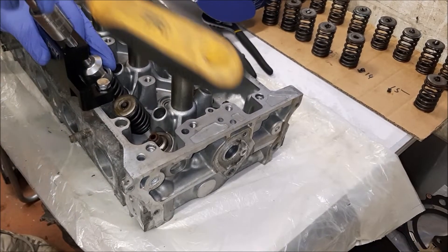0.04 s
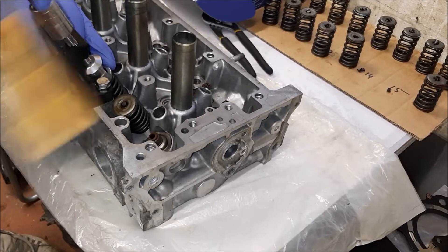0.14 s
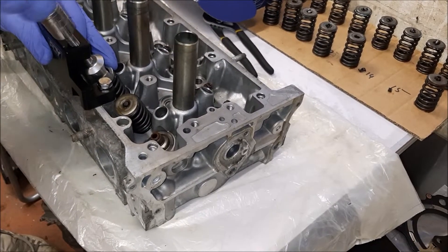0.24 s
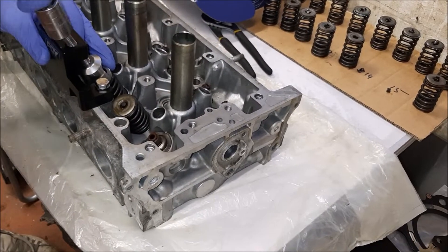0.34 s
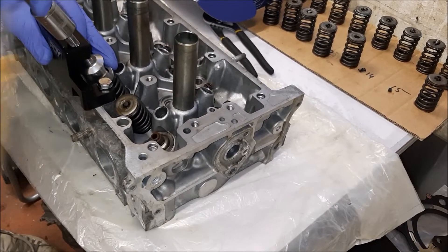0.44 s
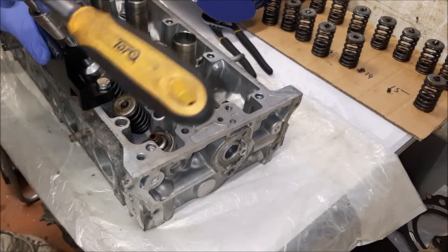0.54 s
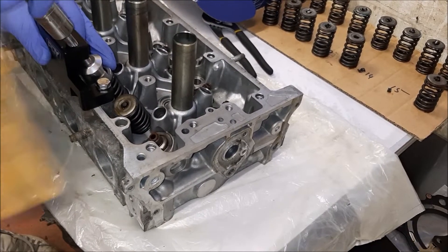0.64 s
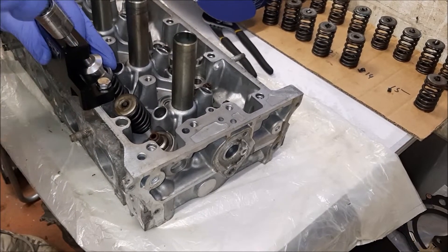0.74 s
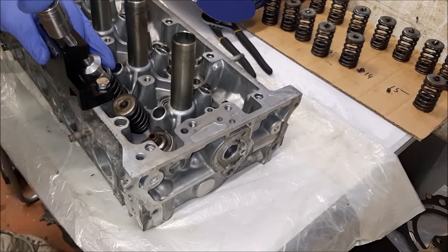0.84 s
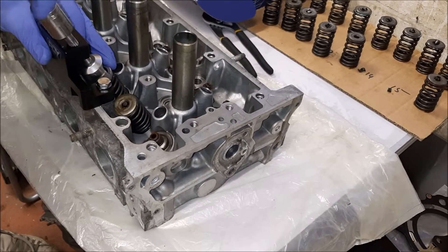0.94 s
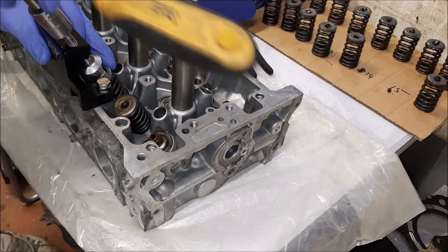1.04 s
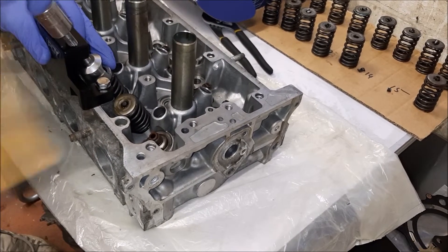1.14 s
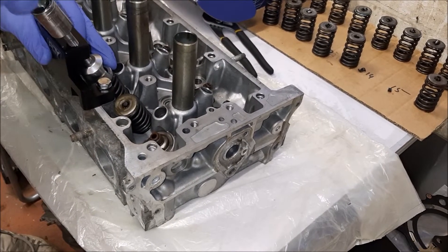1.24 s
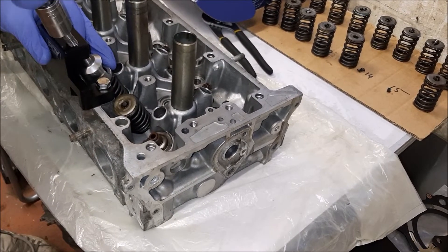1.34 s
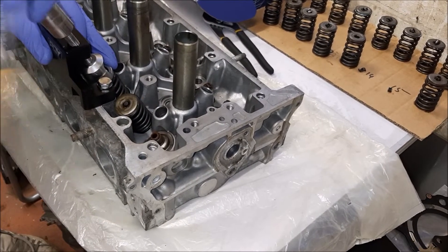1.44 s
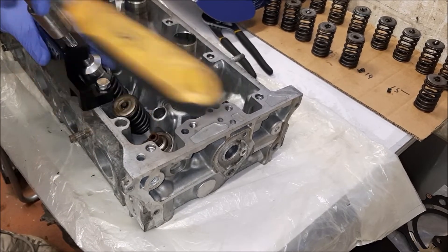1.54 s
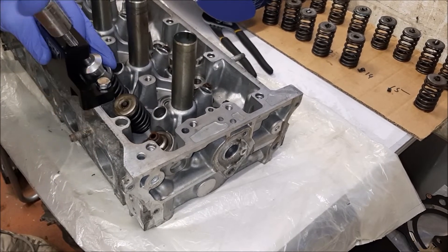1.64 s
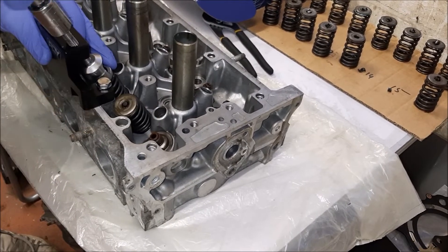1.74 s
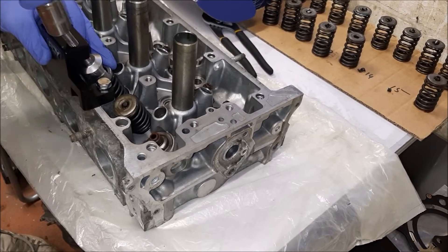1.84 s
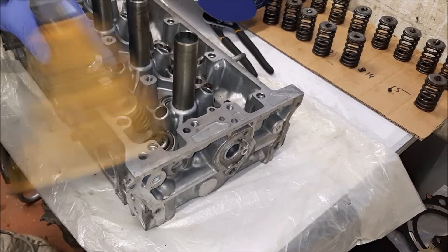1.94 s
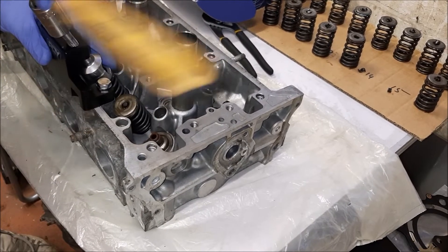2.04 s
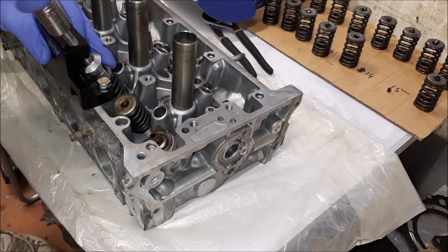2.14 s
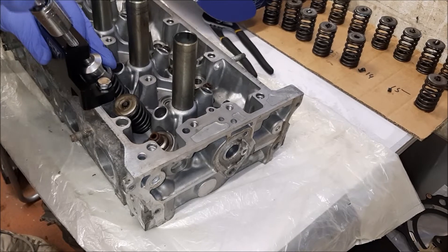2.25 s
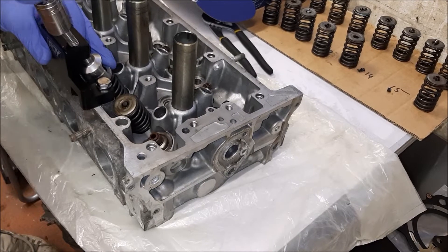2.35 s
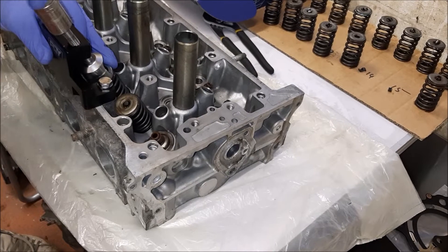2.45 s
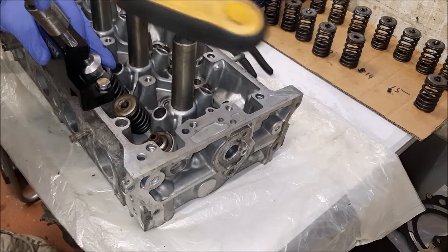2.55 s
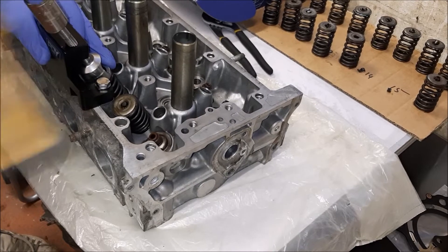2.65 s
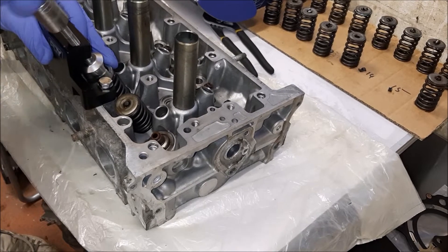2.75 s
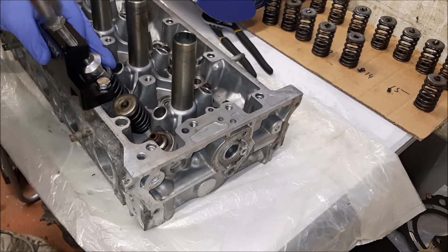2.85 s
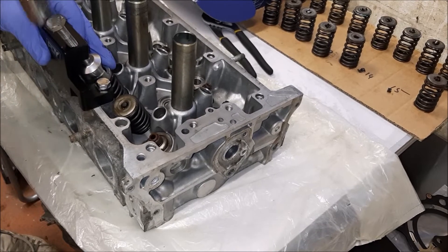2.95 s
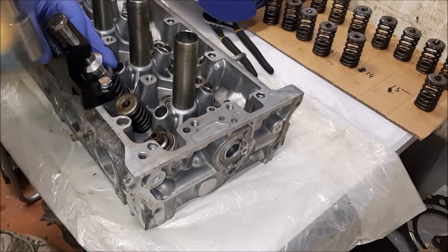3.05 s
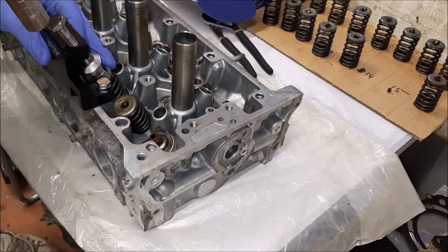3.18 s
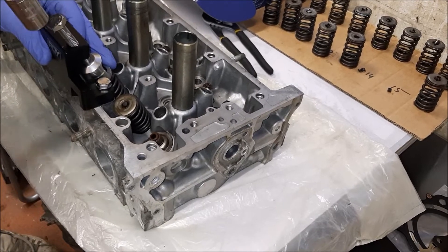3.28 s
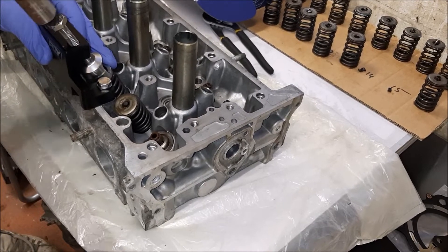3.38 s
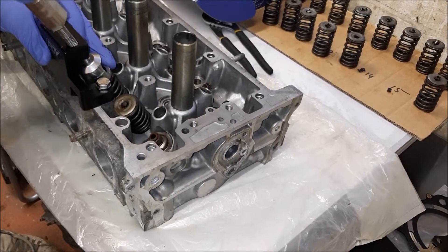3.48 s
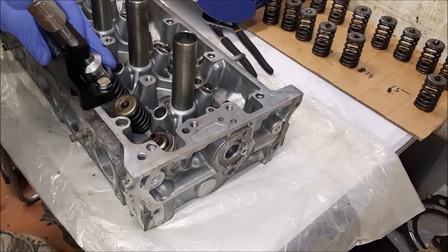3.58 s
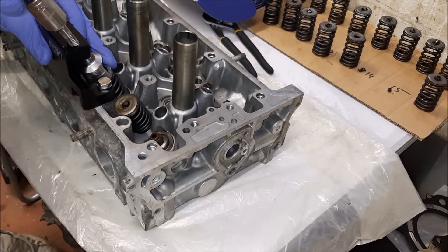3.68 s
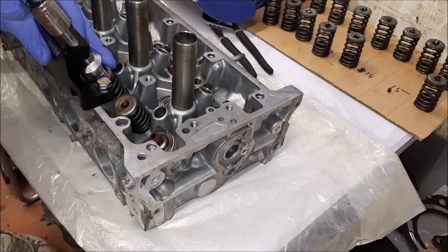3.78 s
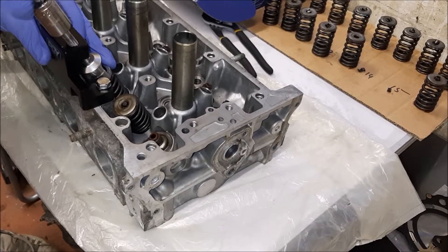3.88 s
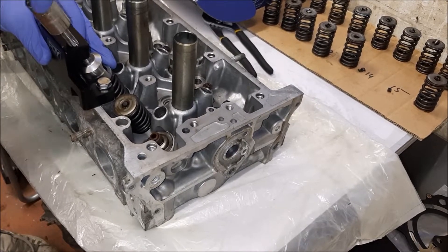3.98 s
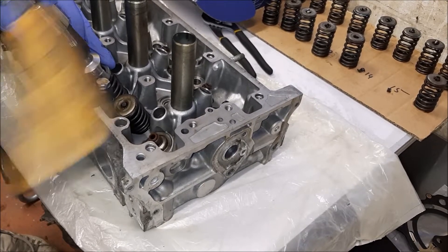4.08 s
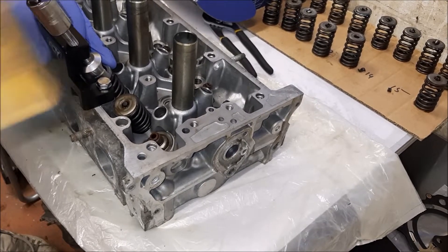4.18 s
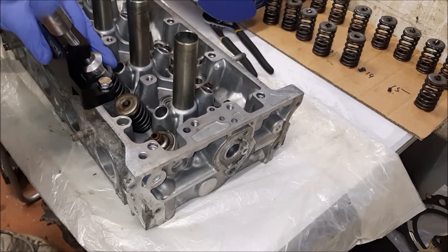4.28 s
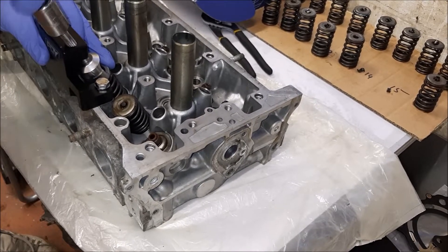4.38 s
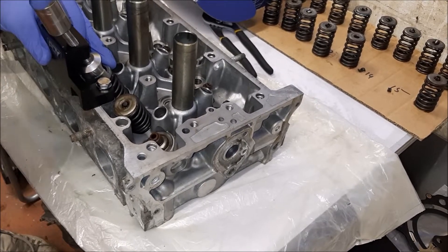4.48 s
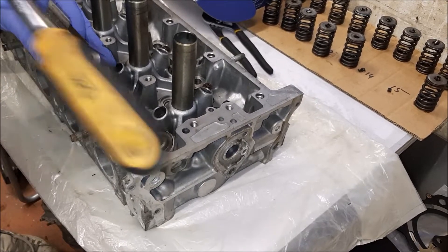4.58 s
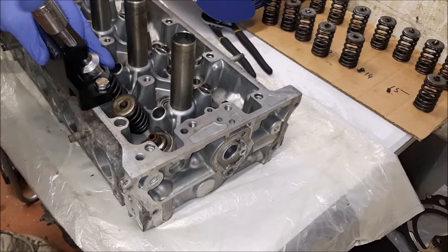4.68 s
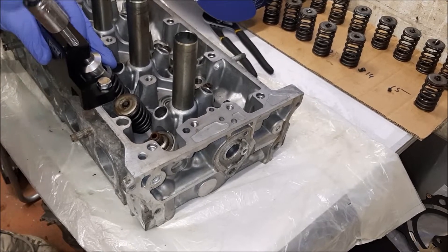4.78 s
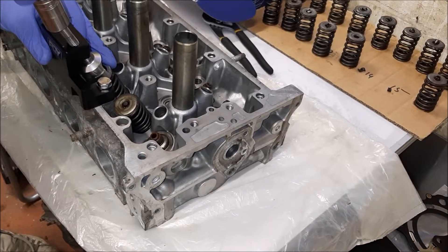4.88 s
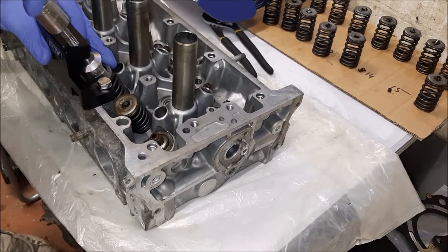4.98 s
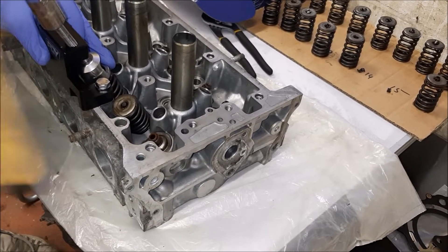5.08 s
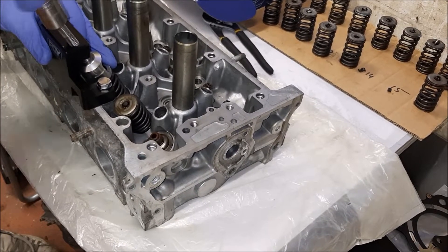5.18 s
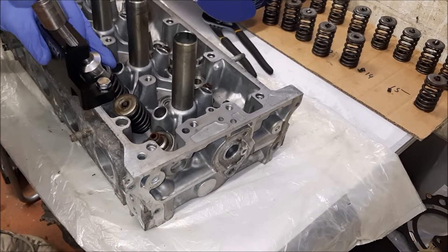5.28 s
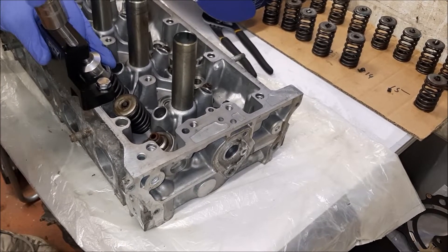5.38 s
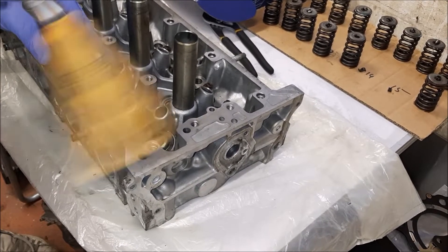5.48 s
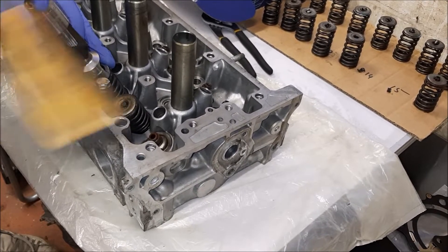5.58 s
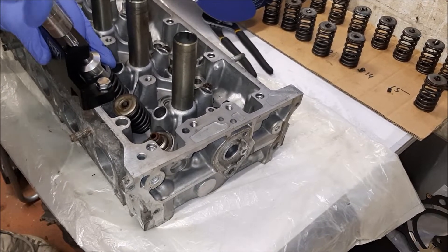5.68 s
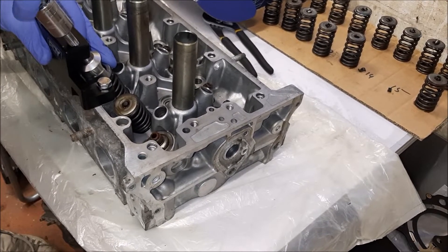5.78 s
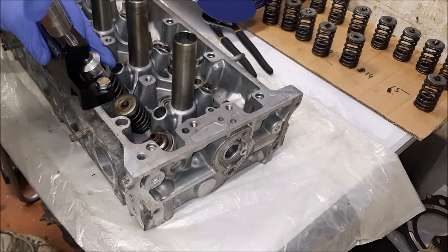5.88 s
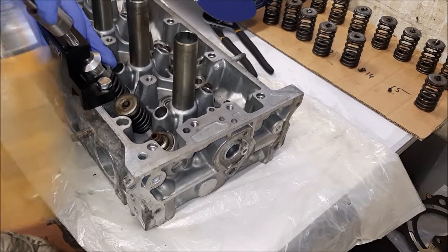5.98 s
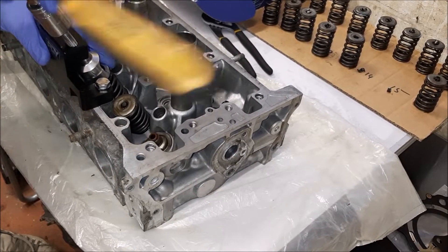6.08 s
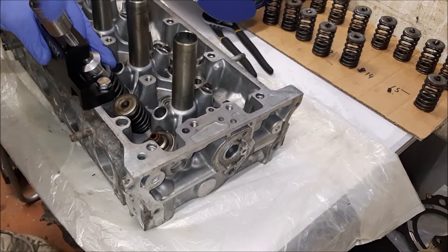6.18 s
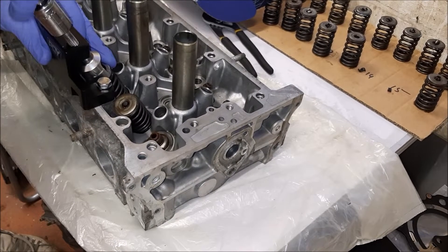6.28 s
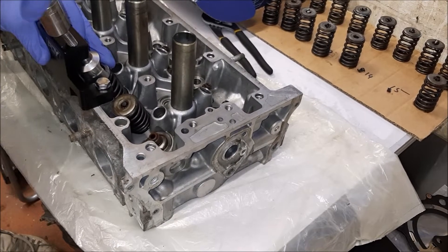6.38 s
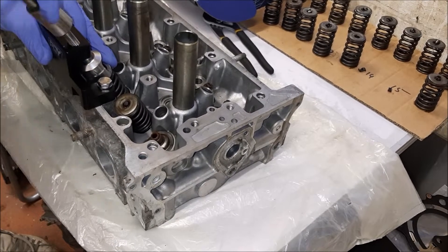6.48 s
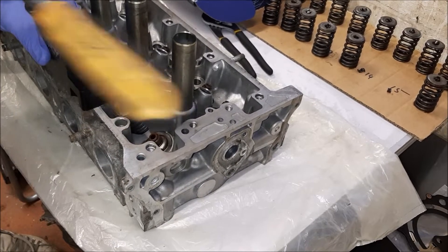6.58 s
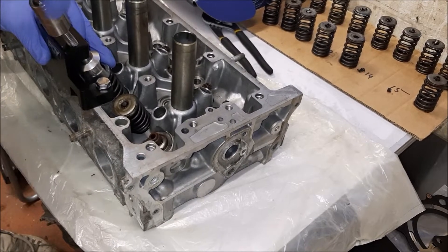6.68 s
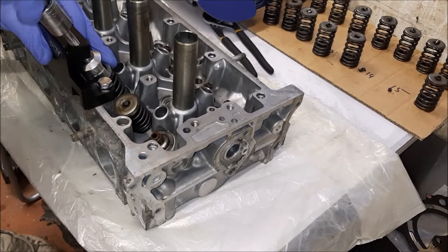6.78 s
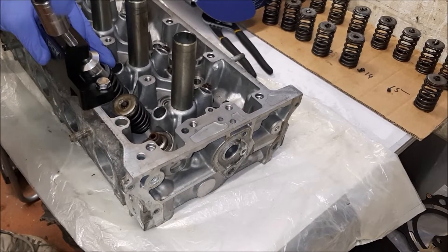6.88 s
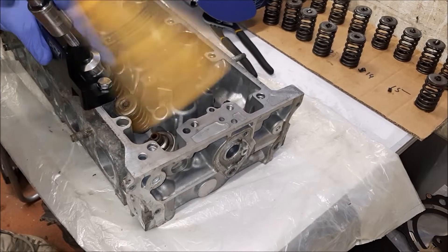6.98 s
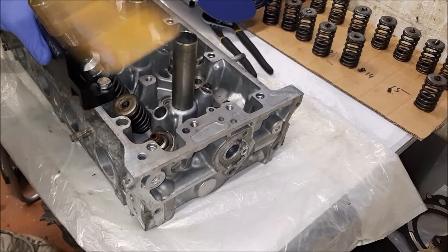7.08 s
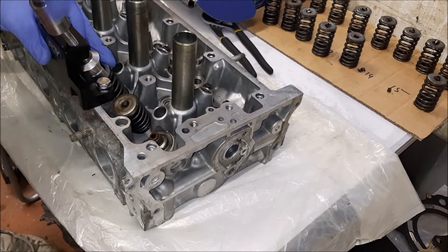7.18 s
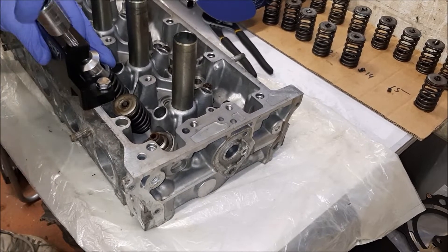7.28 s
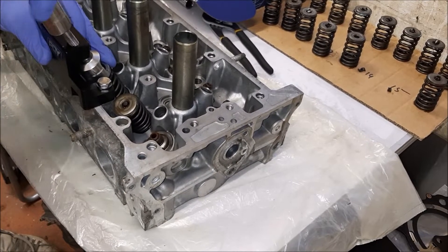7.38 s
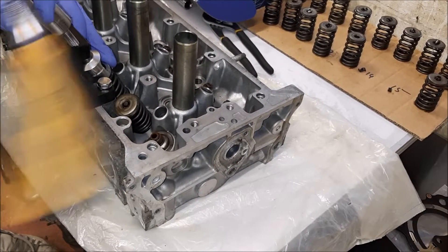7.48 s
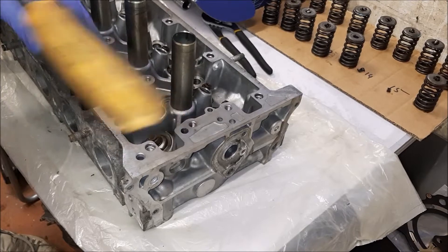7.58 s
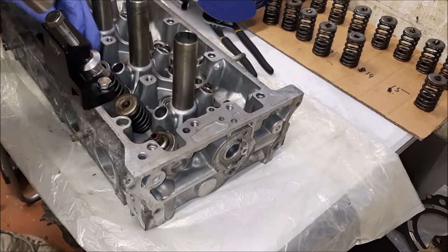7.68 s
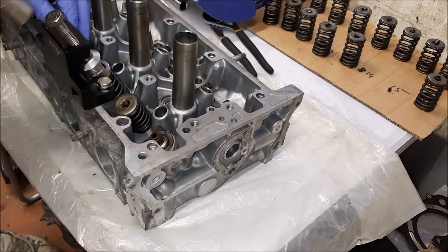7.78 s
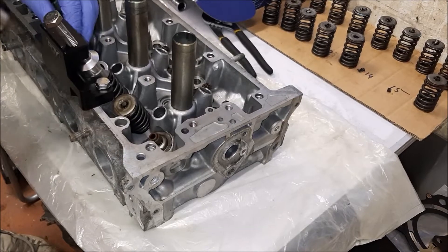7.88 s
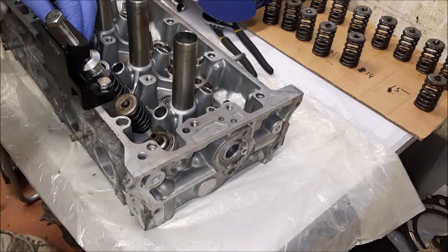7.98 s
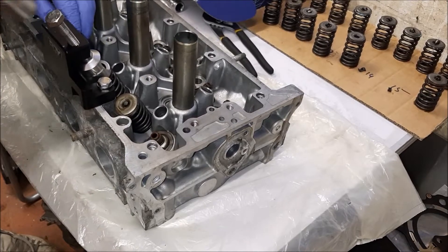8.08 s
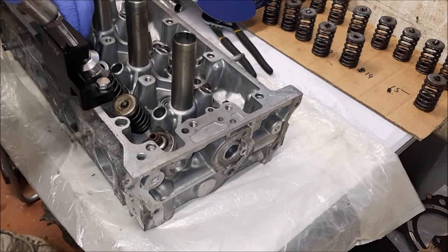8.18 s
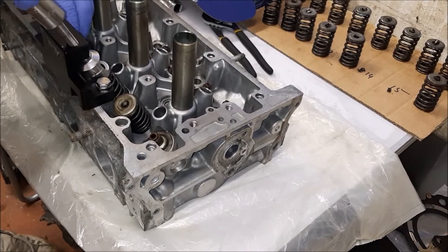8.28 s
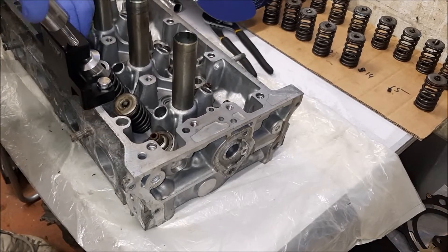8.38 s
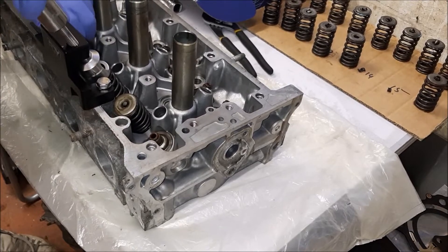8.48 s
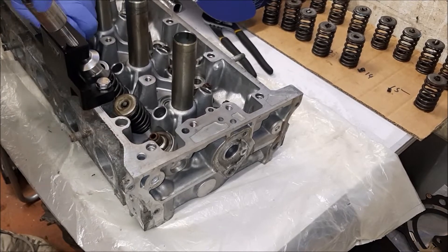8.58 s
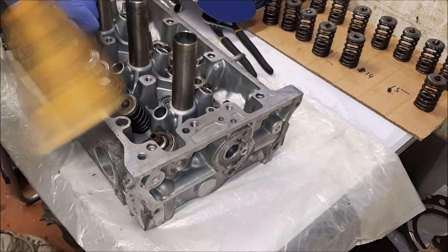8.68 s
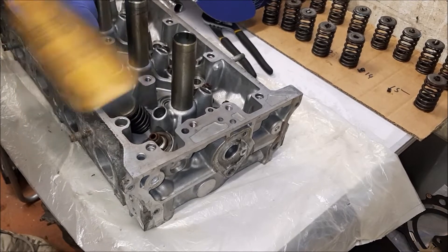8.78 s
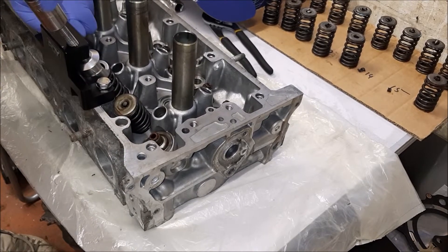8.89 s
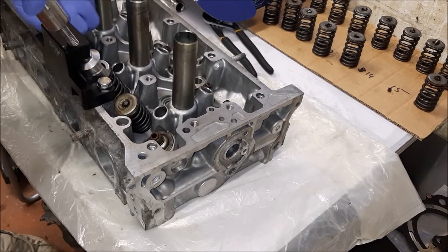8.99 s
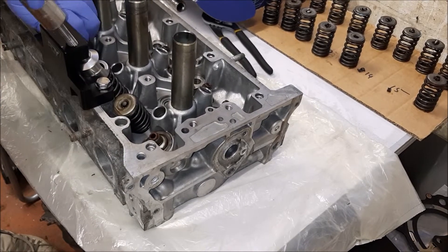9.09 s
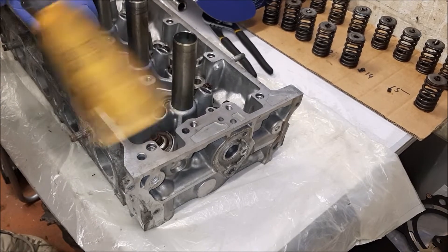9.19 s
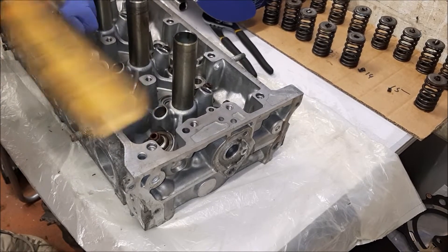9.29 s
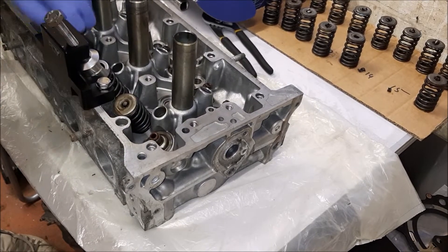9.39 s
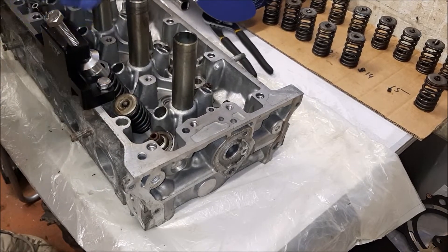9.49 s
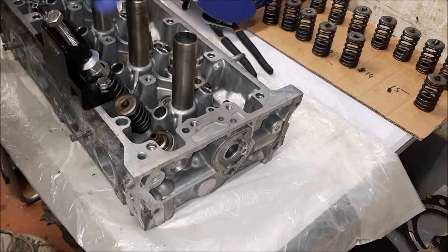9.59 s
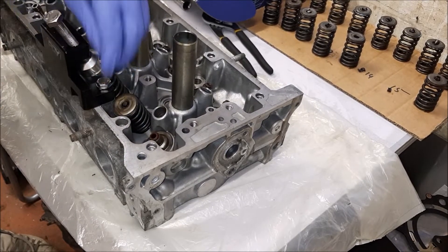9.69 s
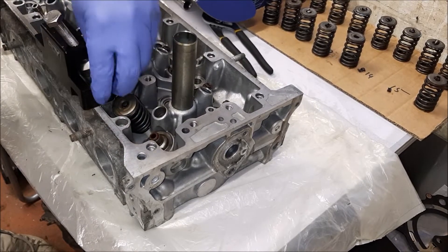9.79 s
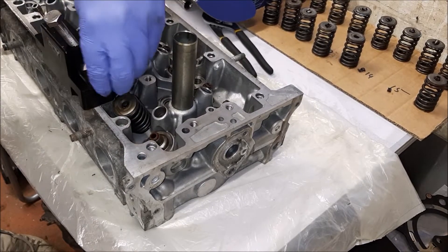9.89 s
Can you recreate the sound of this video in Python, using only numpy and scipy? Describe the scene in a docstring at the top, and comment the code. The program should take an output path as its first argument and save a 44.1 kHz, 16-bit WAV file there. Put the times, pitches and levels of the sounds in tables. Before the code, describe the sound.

Close stereo pickup in a small, live garage: a ratchet handle zips backward about twice a second, its teeth merging into a bright buzzing rasp. Between zips come quiet scrapes, steel chinks and a low bench rumble. Near three seconds it stops for a loud clank and small knocks, resumes for several swings, then slows to separate clicks, one short weak zip and faint glove rustling.

```python
"""In a small garage, a ratchet wrench works a valve tool on an aluminium cylinder head, about two swings a second
with longer pauses. On each back swing the pawl drops from tooth to tooth, and these impulses, speeding up and
slowing again, excite the wrench and head. On the drive stroke the steel rings in decaying modes and slides with
uneven friction noise, while the workbench rumbles in low bands under the hand. Short echoes and a faint steady
room noise surround it all."""
import sys
import numpy as np
from scipy import signal
from scipy.fft import rfft, irfft, next_fast_len
from scipy.io import wavfile
from scipy.ndimage import map_coordinates

SR = 44100
rng = np.random.default_rng(int(sys.argv[2]) if len(sys.argv) > 2 else 0)


def int16_out(signal):
    """Quantize to a 16-bit WAV file."""
    q = np.round(np.clip(np.atleast_2d(signal).T, -1, 1) * 32767)
    wavfile.write(sys.argv[1], SR, q.astype(np.int16))


N = 438354  # length in samples


def amp(db):
    """Level and amplitude: 20 dB is a factor of ten in amplitude."""
    return 10 ** (np.asarray(db) / 20)


def unit(x):
    """Normalisation to a root-mean-square amplitude of 1."""
    return x / np.sqrt(np.mean(x ** 2) + 1e-20)


def along(points, hz):
    """Logarithmic frequency scale: (f/Hz, value) points joined by straight lines over log frequency."""
    f, v = np.transpose(points)
    return np.interp(np.log(hz + 1), np.log(f + 1), v)


def wobble(rate):
    """Slow random modulation: a smooth curve through random knots, rate knots a second."""
    knots = rng.standard_normal(int(N * rate / SR) + 4)
    return map_coordinates(knots, [np.arange(N) * rate / SR])


def filtered(x, response):
    """Linear filtering: the spectrum of x times a complex response of frequency."""
    m = next_fast_len(N + SR // 2)
    return irfft(rfft(x, m) * response(np.fft.rfftfreq(m, 1 / SR)), m)[..., :N]


def coloured(x, spectrum, size=8192):
    """Minimum-phase filtering: a causal impulse response of energy 1 with the shape of this spectrum."""
    log_gain = np.log(amp(along(spectrum, np.fft.rfftfreq(size, 1 / SR))))
    cepstrum = irfft(log_gain)
    # folding the cepstrum onto positive times makes the filter causal
    cepstrum[1:size // 2] *= 2
    cepstrum[size // 2 + 1:] = 0
    pulse = irfft(np.exp(rfft(cepstrum)))
    pulse = pulse / np.linalg.norm(pulse)
    return signal.fftconvolve(np.atleast_2d(x), pulse[None], axes=1)[:, :N]


def grains(rate, spread_db):
    """Granular friction: randomly timed impulses of uneven size and sign, rate a second, rms 1."""
    size = amp(spread_db * np.clip(rng.standard_normal(N), -2, 2))
    present = rng.random(N) < rate / SR
    return unit(present * size * np.sign(rng.standard_normal(N)))


def burst(t60):
    """Exponential decay: noise that starts at rms 1 and falls 60 dB in t60 seconds."""
    t = np.arange(SR // 4) / SR
    return rng.standard_normal(len(t)) * amp(-60 * t / t60)


def add(track, s, sound):
    """Superposition: a sound is summed into a track at time s."""
    part = track[max(round(s * SR), 0):][:len(sound)]
    part += sound[:len(part)]


def swell(s, length, db, rise, fall, sag_db=0):
    """Exponential envelope: climbs to db at time s, sags for its length, then dies; rise and fall in dB/s."""
    t = np.arange(0, N, 64) / SR - s  # one gain every 64 samples
    held = np.clip(t / length, 0, 1)
    climb = abs(rise) * np.maximum(-t, 0)
    release = abs(fall) * np.maximum(t - length, 0)
    return amp(db - climb - sag_db * held - release)


def together(swells):
    """Incoherent summation: swells add in power, giving one gain per sample."""
    gain = np.sqrt(np.sum(np.square(swells), axis=0))
    return np.interp(np.arange(N), np.linspace(0, N, len(gain)), gain)


# envelope of a push: time to climb 20 dB in a drive stroke and in a change of grip, sag while held, release
DRIVE_ATTACK_S, GRIP_ATTACK_S, DRIVE_SAG_DB, DRIVE_RELEASE_DB_PER_S = 0.078, 0.047, 9, 170.5


def push(s, length, db, attack):
    """Attack, hold and release: the hand leans on the tool, sags while holding and lets go."""
    return swell(s, length, db, 20 / attack, DRIVE_RELEASE_DB_PER_S, DRIVE_SAG_DB)


# spectrum of the room noise: f/Hz, relative level/dB
AIR_SPECTRUM = [(20, -7.5), (60, -6), (134, 0.5), (200, -7), (420, -14), (700, -18.5), (1200, -23.5),
                (2050, -25), (3000, -32.5), (5000, -23.5), (8700, -32.5), (12000, -23.5), (16000, -24.5)]


def air(level_db=-80):
    """Partly correlated stationary noise: a shared part and weaker independent parts at the two ports."""
    left, right, shared = (coloured(rng.standard_normal(N), AIR_SPECTRUM) for _ in range(3))
    return amp(level_db) * (shared + 0.33 * np.vstack([left, right]))


# decay of the garage echoes: f/Hz, reverberation time T60/s
GARAGE_DECAY = [(150, 0.66), (500, 0.27), (1200, 0.29), (3000, 0.32), (7000, 0.28), (15000, 0.21)]


def room_answer(wet_db, walls_db):
    """Reverberation: a brief dense burst of close reflections and a tail that decays at its own rate per band."""
    hz, t, z = signal.stft(rng.standard_normal((2, SR // 2)), SR, nperseg=256)
    decay = amp(-60 * t / along(GARAGE_DECAY, hz)[:, None])
    build_up = 1 - np.exp(-t / 0.0015)
    tail = signal.istft(z * decay * build_up, SR, nperseg=256)[1]
    near = rng.standard_normal(tail.shape) * amp(-60 * np.arange(tail.shape[1]) / SR / 0.015)  # T60 15 ms
    return (amp(wet_db) * unit(tail) + amp(walls_db) * unit(near)) / np.sqrt(tail.shape[1])


def garage(x, wet_db, walls_db, lag, size=16384):
    """Interaural delay and reverberation: direct sound reaches the left port first (lag in s); the echoes
    shift, crossfaded from window to window, as hand and tool move."""
    direct = filtered(x, lambda f: np.array([np.ones_like(f), np.exp(-2j * np.pi * f * lag)]))
    hop = size // 2
    fade = np.sin(np.pi * np.arange(size) / size)
    padded = np.pad(x, ((0, 0), (hop, size)))
    echoes = np.zeros((2, padded.shape[1] + SR))
    for i in range(0, N + hop, hop):
        part = signal.fftconvolve(fade * padded[:, i:i + size], room_answer(wet_db, walls_db), axes=1)
        echoes[:, i:i + part.shape[1]] += part
    out = direct + echoes[:, hop:][:, :N]
    return out * np.sqrt(2 / (1 + amp(walls_db) ** 2 + amp(wet_db) ** 2))


# spectra of the bench rumble and of the hollow rub: f/Hz, relative level/dB
BENCH_SPECTRUM = [(20, -29), (35, -26), (48, -25.5), (65, -11.5), (92, -22), (112, -6), (137, 4.5),
                  (155, -2.5), (180, -11), (210, -15.5), (400, -52)]
HOLLOW_SPECTRUM = [(150, -31), (235, -6), (280, 0.5), (308, -10.5), (332, 2.5), (365, -3), (420, 3),
                   (470, -3), (700, -6), (920, -8.5), (1300, -16), (3000, -47.5)]
# drive strokes, when the wrench takes the load and rocks the head on the bench:
# t/s, duration/s, relative rumble level/dB, relative hollow rub level/dB
DRIVES = [(0.333, 0.23, -52, -56.5), (0.891, 0.42, -51.5, -59), (1.496, 0.097, -43, -56.5),
          (1.826, .3, -47.5, -49.5), (2.383, 0.34, -49, -54), (2.786, 0.27, -47.5, -48),
          (4.392, 0.26, -51.5, -56), (4.933, 0.077, -44, -54), (5.268, 0.14, -46.5, -50),
          (5.75, .32, -55.5, -61), (6.423, 0.19, -52, -55), (6.855, 0.083, -49, -55.5),
          (7.408, .18, -50.5, -62), (8.559, 0.085, -58.5, -60.5), (9.121, 0.028, -56.5, -58.5)]
# changes of grip: t/s, duration/s, then relative levels/dB of rumble, hollow rub, scrape
SHIFTS = [(0.006, 0.029, -39, -48.5, -46), (3.012, 0.064, -53.5, -46, -68), (3.19, 0.075, -56, -55, -74),
          (3.601, 0.11, -62, -56.5, -68), (3.658, .012, -58, -62, -54.5), (3.737, 0.061, -48.5, -51, -53),
          (3.937, 0.081, -57, -55.5, -53), (4.045, 0.082, -61, -74, -57.5),
          (7.646, 0.078, -63, -61.5, -60.5), (8.078, 0.049, -62, -65, -79), (8.371, 0.093, -57, -51.5, -60),
          (8.908, .03, -61, -66, -65), (9.324, 0.067, -77, -68.5, -66), (9.603, 0.018, -60.5, -85, -89)]
RUB_RISE_DB_PER_S, RUB_FALL_DB_PER_S = 79, 71
SWING_RUMBLE_DB = -8.5  # rumble of a back swing relative to its rub


def bench(rumble_db=0, rub_db=-1, lumps_db=1.5):
    """Forced vibration and friction: the rocking head shakes the bench top and rubs on its cloth,
    in mid swing and under each push."""
    swings = [swell(s + length / 2, length / 2, db, RUB_RISE_DB_PER_S, RUB_FALL_DB_PER_S, 0.71)
              for s, length, *_, db in SWINGS]
    pushes = [(*row, DRIVE_ATTACK_S) for row in DRIVES]
    pushes += [(*row[:4], GRIP_ATTACK_S) for row in SHIFTS]
    low_pushes = [push(s, length, db, attack) for s, length, db, _, attack in pushes]
    hollow_pushes = [push(s, length, db, attack) for s, length, _, db, attack in pushes]
    low = together([amp(SWING_RUMBLE_DB) * gain for gain in swings] + low_pushes)
    hollow = together(swings + hollow_pushes)
    lumps = lumps_db * wobble(22)
    rumble = low * amp(rumble_db + lumps) * coloured(rng.standard_normal(N), BENCH_SPECTRUM)
    rub_grain = coloured(grains(rate=900, spread_db=6.5), HOLLOW_SPECTRUM)
    rub = hollow * amp(rub_db + lumps / 2) * rub_grain
    return rumble, rub


# soft bumps of the hand on the head: t/s, level/dB before the room
BUMPS = [(1.765, -52.5), (2.377, -43.5), (3.28, -54.5), (6.125, -51), (8.06, -55.5), (9.585, -66.5),
         (9.616, -64.5)]


def bumps(t60=0.25):
    """Soft impact: a gloved hand gives a low, dying noise burst, the answer of the hollow casting."""
    out = np.zeros(N)
    for s, db in BUMPS:
        add(out, s, amp(db) * burst(t60))
    return coloured(out, [(120, -23.5), (260, 7), (450, 5.5), (700, -4.5), (1500, -44), (4000, -61.0)])


# brushes of the rubber glove over metal: t/s, duration/s, level/dB before the room
RUSTLES = [(7.992, 0.11, -73), (9.296, 0.61, -74), (9.306, 0.037, -81), (9.48, .05, -68.5),
           (9.808, 0.031, -75)]
# spectrum of the glove hiss: f/Hz, relative level/dB
GLOVE_SPECTRUM = [(1500, -13), (3000, -6.5), (5000, -1.5), (7500, -3.5), (8700, -22.5), (11000, -8.5),
                  (15500, -2.5)]


def glove(level_db=0):
    """Sliding friction: dense grains make a faint, uneven hiss of rubber on metal."""
    brush = coloured(grains(rate=4000, spread_db=4), GLOVE_SPECTRUM)
    strokes = together([push(*row, DRIVE_ATTACK_S) for row in RUSTLES])
    return strokes * amp(level_db + 2 * wobble(40)) * brush


# short tonal metal sounds (squeaks, a brief ping, a tone within a scrape):
# t/s of the peak, f/Hz, level/dB before the room, half duration/s
METAL_TONES = [(0.058, 10280, -51.5, 0.022), (3.985, 9100, -60, 0.062), (4.496, 10470, -53, 0.016),
               (3.666, 1824, -43.5, 0.023), (3.701, 2990, -34, 0.0181), (9.322, 4290, -57, 0.02),
               (9.484, 2060, -75, 0.059), (9.677, 4900, -85, 0.24)]


def metal_tones(waver=0.015):
    """Frequency modulation: short tonal metal sounds, each a swell of a sine whose pitch wavers at random."""
    out = np.zeros(N)
    drift = 1 + waver * wobble(200)
    for s, hz, db, length in METAL_TONES:
        count = round(2 * length * SR)
        tone = np.sin(2 * np.pi * hz * np.cumsum(drift[:count]) / SR)
        add(out, s - length, amp(db) * np.hanning(count) ** 2 * tone)
    return out


# spectrum of steel sliding on steel: f/Hz, relative level/dB
SLIDING_SPECTRUM = [(500, -10), (1050, 4.5), (1380, 6.5), (1750, 3), (2050, 8.5), (2500, -0.5), (3300, 1.5),
                    (5000, -2.5), (7500, -10), (8700, -23), (11000, -12), (15500, -15.5)]
SCRAPE_RISE_DB_PER_S, SCRAPE_FALL_DB_PER_S = 168.5, 85


def sliding(level_db=-3, drive_db=-5):
    """Sliding friction: the tool scrapes on the valve spring, most as the handle turns round, lightly under load."""
    turns = [swell(s + length, .01, db, SCRAPE_RISE_DB_PER_S, SCRAPE_FALL_DB_PER_S)
             for s, length, *_, db, _ in SWINGS]
    loads = [push(s, length, db + drive_db, DRIVE_ATTACK_S) for s, length, _, db in DRIVES]
    grips = [push(s, length, db, GRIP_ATTACK_S) for s, length, _, _, db in SHIFTS]
    scrape = coloured(grains(rate=1500, spread_db=5), SLIDING_SPECTRUM)
    return together(turns + loads + grips) * amp(level_db + 2.94 * wobble(49)) * scrape


def take_up(level_db=-55, lead=0.06, rise_db=8):
    """Backlash: just before each back swing the socket chatters through its slack, growing over lead seconds."""
    level, t = np.zeros(N), np.arange(round(lead * SR)) / SR
    for s, *_ in SWINGS:
        add(level, s - lead, amp(level_db + rise_db * (t / lead - 1.5)))
    chatter = grains(rate=220, spread_db=2)
    return coloured(level * chatter, SLIDING_SPECTRUM)


# modes of the steel tool: f/Hz, mean level/dB relative to the knock, T60/s
STEEL_MODES = [(1183, -1.5, 0.013), (1338, 0.5, 0.035), (1439, -9, 0.08), (1483, -5, 0.047),
               (1995, -11, 0.07), (2950, -9.5, 0.047)]


def steel_ring():
    """Modal synthesis: one knock is a sum of decaying sines, pitch and balance a little different each time."""
    t = np.arange(SR // 4) / SR
    ring = np.zeros(len(t))
    for hz, level, t60 in STEEL_MODES:
        decay = amp(level + rng.normal(0, 1.4) - 60 * t / t60)
        ring += decay * np.sin(2 * np.pi * (hz * rng.normal(1, 0.013) * t + rng.random()))
    return ring


def chinks(level_db=-6, spread_db=3, rattle_db=0, count=3):
    """Repeated light impact: under load the tool settles on the spring, chinking louder for a harder push."""
    out = np.zeros(N)
    for s, length, _, db in DRIVES:
        for where, size in rng.random((count, 2)):
            chink = steel_ring() + amp(rattle_db) * burst(t60=.02)
            add(out, s + where * length, amp(db + level_db + spread_db * (2 * size + 1)) * chink)
    return out


def clicks(energy, crack_t60, ring_t60, ring_share, apart=1.9):
    """Energy decay: each impulse becomes noise with a sharp crack, then a short ring, partly unlike at the ports."""
    t = np.arange(SR // 10) / SR
    crack, ring = amp(-60 * t / crack_t60) ** 2, amp(-60 * t / ring_t60) ** 2
    share = np.clip(ring_share, 0, 1)
    decay = (1 - share) * crack / crack.sum() + share * ring / ring.sum()
    power = signal.fftconvolve(energy, decay)[:N]
    noise = unit(rng.standard_normal(N) + apart * rng.standard_normal((2, N)))
    return np.sqrt(np.abs(power)) * noise


# other knocks of the tool: t/s, then relative levels/dB of knock, ring, treble
CLANKS = [(0.4199, -36, -43.5, -56), (1.1495, -33.5, -45.5, -62.5), (1.6257, -34, -48, -68),
          (1.878, -27, -43, -56), (2.0223, -39.5, -55, -62), (2.361, -42, -34.5, -60.5),
          (2.9931, -10, -37, -34.5), (3.5716, -24, -46.5, -61), (3.658, -55, -41, -73),
          (3.6931, -13, -60, -46), (3.7513, -24, -42, -51), (3.921, -26.5, -45.5, -52.5),
          (4.564, -37.5, -61.5, -65), (4.9203, -26.5, -56.5, -61.5), (5.2829, -18, -33.5, -51),
          (5.3728, -22.5, -37.5, -61), (5.5347, -42, -52.5, -77), (5.9225, -26.5, -39, -63),
          (6.0182, -40, -49.5, -60), (6.5268, -35, -48, -52), (6.651, -33.5, -51, -72),
          (7.0203, -38.5, -53, -76), (7.3996, -25.5, -48, -44), (7.5053, -39, -45.5, -74),
          (7.624, -38, -53.5, -75), (8.0536, -40.5, -81, -62), (8.3206, -23, -39.5, -52),
          (8.3482, -24.5, -39, -62), (8.5715, -27, -48, -52), (9.301, -42, -71, -77)]
# spectrum of a knock: f/Hz, relative level/dB
KNOCK_SPECTRUM = [(200, -19.5), (800, -5), (1350, -3.5), (1750, -5), (2500, -3), (3080, -2), (3600, -1),
                  (4700, -3), (6000, -5), (7600, -6.5), (8600, -28.5), (16000, -27)]
# the knock before each swing: its lead, and its ring and tick relative to the knock
SLACK_LEAD_S, SLACK_RING_DB, SLACK_TREBLE_DB = .03, -15, -25.5


def clanks(knock_db=6, steel_db=5, tick_db=-3):
    """Impact excitation: a brief rattle, a bright tick and the tool's modes; one knock precedes every swing."""
    knocks, ticks, rings = np.zeros((3, N))
    t = np.arange(SR // 4) / SR
    onset = 1 - np.exp(-t / 0.0016)
    slack = [(s - SLACK_LEAD_S, db, db + SLACK_RING_DB, db + SLACK_TREBLE_DB) for s, _, _, db, *_ in SWINGS]
    for s, db, ring_db, treble_db in slack + list(CLANKS):
        add(rings, s, amp(ring_db + steel_db) * steel_ring() * onset)
        knocks[round(s * SR)] += amp(db + knock_db) ** 2
        add(ticks, s, amp(treble_db + tick_db) * burst(t60=0.052))
    rattle = coloured(clicks(knocks, crack_t60=0.0058, ring_t60=.07, ring_share=0.7), KNOCK_SPECTRUM)
    return rings + rattle + coloured(ticks, [(5000, -30.0), (8700, -10.5), (10800, 1.5), (15500, -2.5)])


# resonances of the wrench and head that the pawl excites: f/Hz, bandwidth/Hz, relative level/dB
HEAD_MODES = [(2320, 15, -8.5), (2630, 55, 4.5), (2950, 32, -17.5), (3276, 30, 8), (5080, 110, -4.5)]


def head_ring(x, ring_db):
    """Resonance: the wrench and cylinder head ring on as damped second-order systems beside the direct sound."""
    def modes(f):
        return sum(amp(db) * 1j * f * w / (c * c - f * f + 1j * f * w) for c, w, db in HEAD_MODES)
    return filtered(x, lambda f: 1 + amp(ring_db) * modes(f))


# back swings of the handle: t/s, duration/s, top speed/(teeth/s), slack knock level/dB, first tooth level/dB,
# pawl level/dB, pawl fade over the swing/dB, wrench body level/dB, its rise over the swing/dB,
# scrape level/dB, hollow rub level/dB; levels are relative within each layer
SWINGS = [(0.183, 0.17, 232, -33.5, -24, -32.5, 6, -37.5, 5, -50.5, -49),
          (0.704, 0.19, 215, -43, -27, -33, 9, -38.5, 4.5, -53.5, -50.5),
          (1.2038, 0.18, 245, -28.5, -23, -32.5, 8.5, -35.5, -1.5, -49, -50),
          (1.6756, 0.17, 230, -26.5, -23.5, -32, 11, -36, -5, -48, -48),
          (2.154, .17, 250, -36.5, -21.5, -31.5, 10, -35.5, 1.5, -50, -53.5),
          (2.6653, 0.13, 210, -29, -25.5, -30.5, 10, -39.5, 5.5, -47.5, -53),
          (4.243, 0.17, 260, -29.5, -22.5, -31.5, 13.5, -38, -1.5, -55.5, -53.5),
          (4.708, 0.17, 235, -33.5, -24, -32.5, 14, -36.5, 9, -51.5, -51),
          (5.176, .1, 259, -30, -25.5, -32.5, 20.5, -36, -7.5, -48.5, -52),
          (5.665, 0.2, 199, -30.5, -25.5, -33.5, 0, -37, -3, -49, -50.5),
          (6.1988, .18, 254, -33, -23.5, -31.5, 7, -36.5, 1, -54.5, -53.5),
          (6.6958, 0.16, 280, -26, -23, -31, 10.5, -35, -2, -51, -50),
          (7.1625, .18, 247, -30, -26.5, -31.5, 5.5, -36.5, 2, -55.5, -50),
          (8.442, 0.085, 52, -46, -27.5, -55, -0.5, -53, 9, -53.5, -71),
          (8.8872, .148, 140, -53, -29, -33, 3, -42.5, -3, -60, -68.5)]
# single teeth that snap out of the rasp: t/s, relative level/dB
TEETH = [(2.7174, -23.5), (4.3844, -30.5), (8.4803, -29), (8.5082, -27), (8.903, -34), (8.9105, -23.5),
         (9.0496, -25.5)]
# spectra of the pawl and of the wrench body: f/Hz, relative level/dB
PAWL_SPECTRUM = [(900, -39), (2200, -18), (3250, -6.5), (4100, -10), (4950, 2.5), (5900, -1), (6900, 1),
                 (7800, -2), (8700, -15.5), (9700, -7.5), (11200, -3), (13200, -2.5), (15600, -5)]
BODY_SPECTRUM = [(300, -19), (850, -7.5), (1100, -6.5), (1380, 3.5), (1700, -3), (2100, 2), (2700, 1.5),
                 (3300, 4), (3900, -0.5), (6000, -7.5), (12000, -21)]
# tilt of the wrench body's ring as a swing starts and as it ends: f/Hz, gain/dB
EARLY_TONE = [(1500, 0), (2500, -1), (3450, 1.5), (4300, -2)]
LATE_TONE = [(1500, 1.5), (2650, 1.5), (3450, -1), (4300, -0.5)]
# a light tick as the pawl lifts, before the first full tooth
LEAD_TOOTH_S, LEAD_TOOTH_DB = .011, -18
# the pawl's second drop follows the first at once; then the steady rasp begins
SECOND_TOOTH_S, SECOND_TOOTH_DB, RUN_UP_S = 0.0053, -1.5, .013


def ratchet(pawl_db=-1.0, body_db=-2, slowest=.25, jitter=.2, scatter_db=2.5, tooth_db=18, tooth_body_db=-6,
            pawl_speed_db=7, body_speed_db=5):
    """Periodic impact: the pawl drops once a tooth; the handle speeds up quickly and slows, and faster is louder."""
    pawl, early, late = np.zeros((3, N))
    snaps = list(TEETH)
    for s, length, top, _, first_db, db, fade_db, wrench_db, rise_db, *_ in SWINGS:
        snaps += [(s - LEAD_TOOTH_S, first_db + LEAD_TOOTH_DB), (s, first_db),
                  (s + SECOND_TOOTH_S, first_db + SECOND_TOOTH_DB)]
        t = np.arange(s + RUN_UP_S, s + length, 1 / SR)
        rate = top * (slowest + (1 - slowest) * np.sin(np.pi * np.linspace(0, 1, len(t)) ** .7))
        passed = np.cumsum(rate) / SR  # teeth passed so far
        tooth = np.arange(.5, passed[-1])
        slip, size = np.clip(rng.standard_normal((100, 2))[:len(tooth)].T, -1.4, 1.4)
        when = np.interp(tooth + jitter * slip, passed, t)
        pace = np.interp(when, t, rate) / top
        done = np.clip((when - s) / length, 0, 1)
        # slow teeth stand apart, fast ones merge into a rasp
        energy = unit(amp(scatter_db * size)) ** 2 * SR / (top * pace)
        at = np.round(when * SR).astype(int)
        pawl_level = pawl_db + db + pawl_speed_db * (pace - 1) - fade_db * (done - .5)
        body_level = body_db + wrench_db + body_speed_db * (pace - 1) + rise_db * (done - .5)
        pawl[at] += energy * amp(pawl_level) ** 2
        body = energy * amp(body_level) ** 2
        early[at] += body * (1 - done)
        late[at] += body * done
    for s, db in snaps:
        pawl[round(s * SR)] += amp(db + tooth_db) ** 2
        early[round(s * SR)] += amp(db + tooth_db + tooth_body_db) ** 2
    bright = coloured(clicks(pawl, crack_t60=0.0017, ring_t60=0.05, ring_share=0.64), PAWL_SPECTRUM)
    wrench = np.zeros((2, N))
    for part, tone in [(early, EARLY_TONE), (late, LATE_TONE)]:
        body_clicks = clicks(part, crack_t60=0.006, ring_t60=.04, ring_share=0.8)
        wrench += filtered(body_clicks, lambda hz: amp(along(tone, hz)))
    return bright + coloured(wrench, BODY_SPECTRUM)


def scene():
    """Superposition: metal sounds spread through the room; the bench rumble is one signal, stronger at right."""
    metal = head_ring(ratchet(), ring_db=-8.5) + clanks() + sliding() + take_up()
    metal = metal + chinks() + glove() + metal_tones()
    rumble, rub = bench()
    bright = garage(metal, wet_db=-0.5, walls_db=-1.0, lag=0.00016)
    hollow = 0.73 * garage(rub + bumps(), wet_db=-7.5, walls_db=-7.5, lag=.00002)
    return bright + hollow + rumble * amp([[-.9], [.9]]) + air()


TOP_HZ = 15950  # band limit


def record(dry):
    """Linear filtering: a left-right balance that varies with frequency, and a steep cut at the band limit."""
    # f/Hz, left minus right level/dB
    balance = [(150, -0.7), (400, -1.2), (1500, -0.5), (2600, -0.3), (4000, -1.0), (6800, -1.8),
               (8200, 2.0), (15000, 1.5)]
    halves = np.array([[.5], [-.5]])

    def response(hz):
        passed = 1 / (1 + (hz / TOP_HZ) ** 200)
        return amp(halves * along(balance, hz)) * passed
    return filtered(dry, response)


dry = scene()
out = record(dry)
int16_out(out)
```